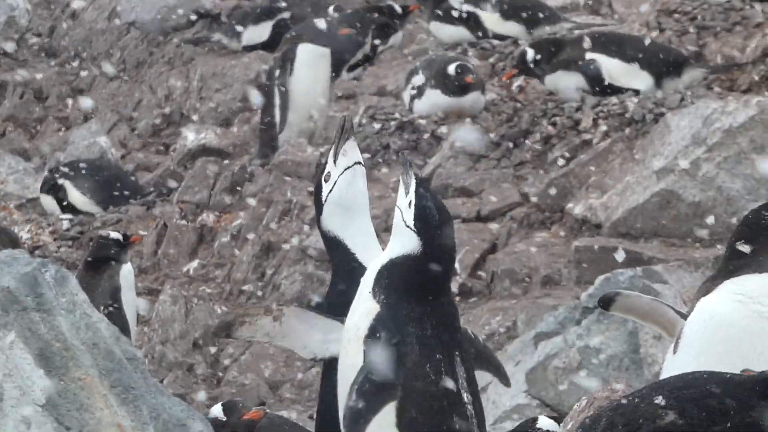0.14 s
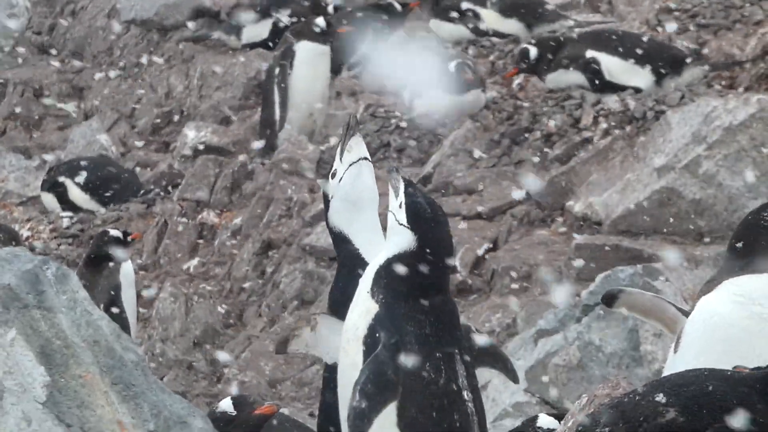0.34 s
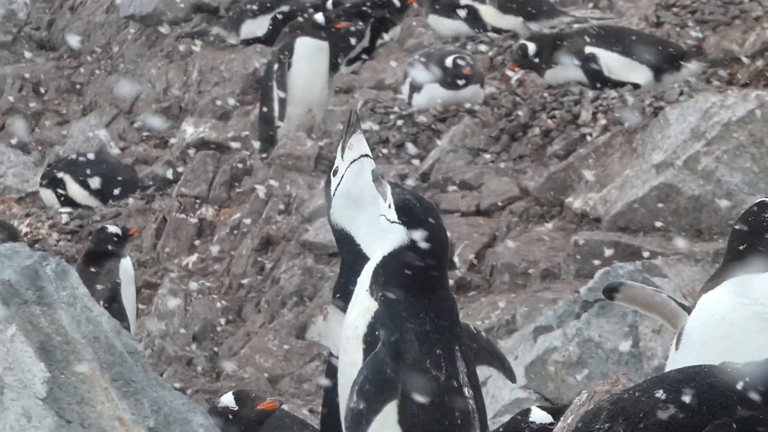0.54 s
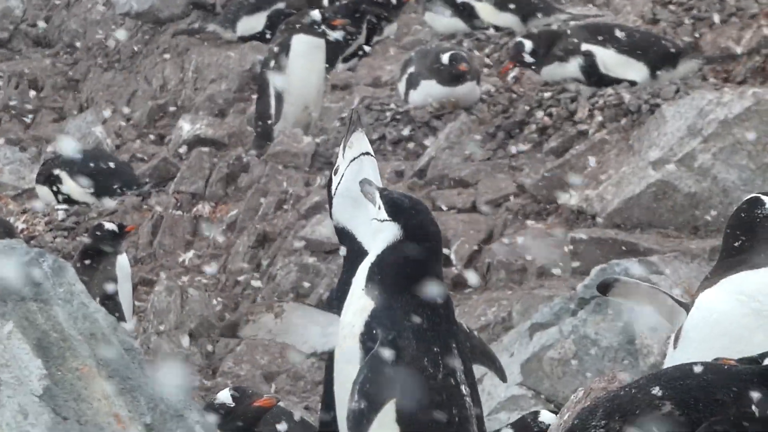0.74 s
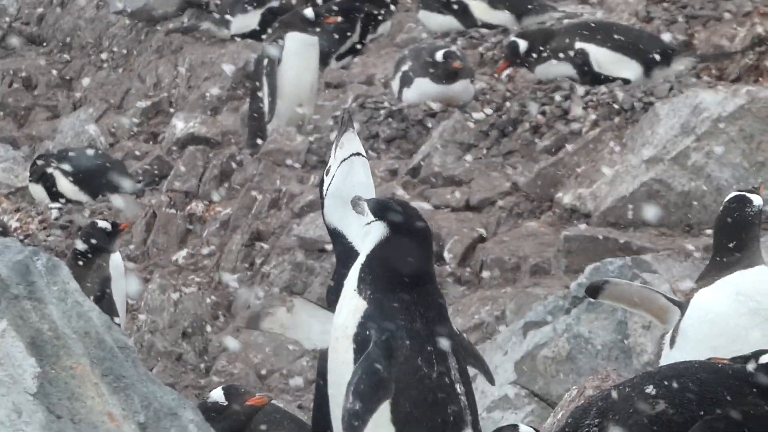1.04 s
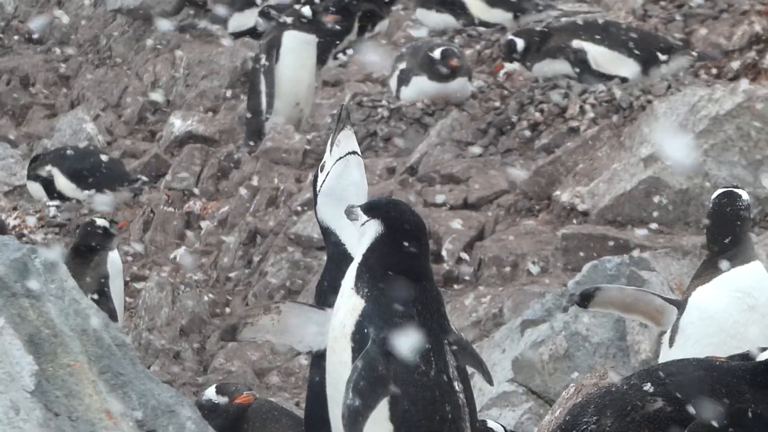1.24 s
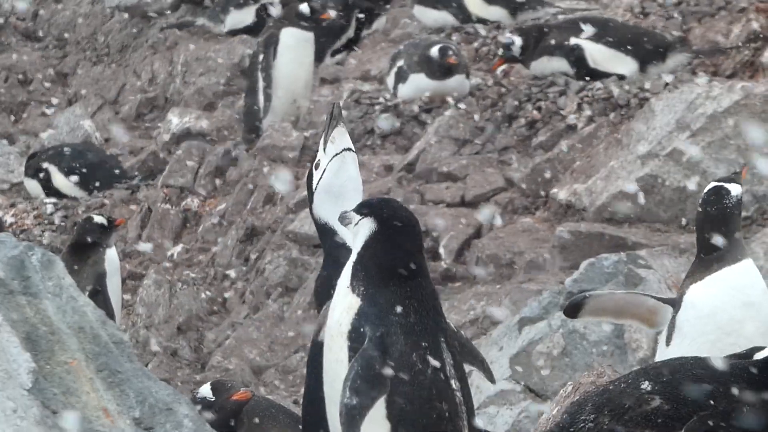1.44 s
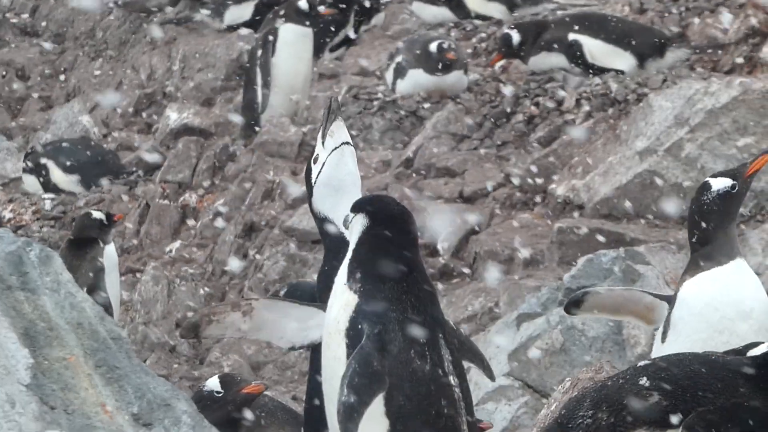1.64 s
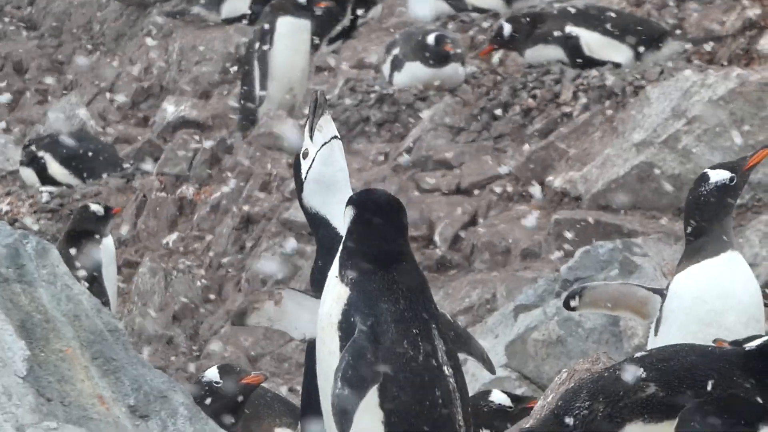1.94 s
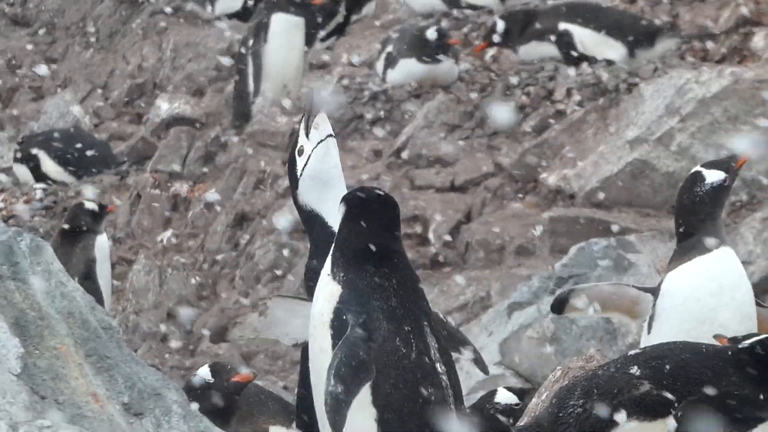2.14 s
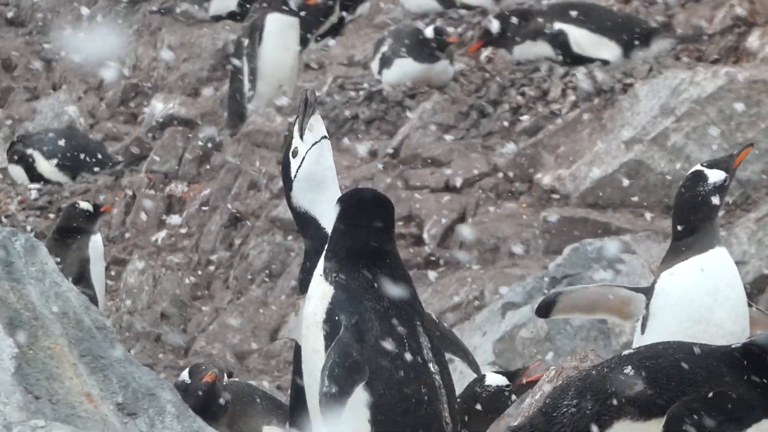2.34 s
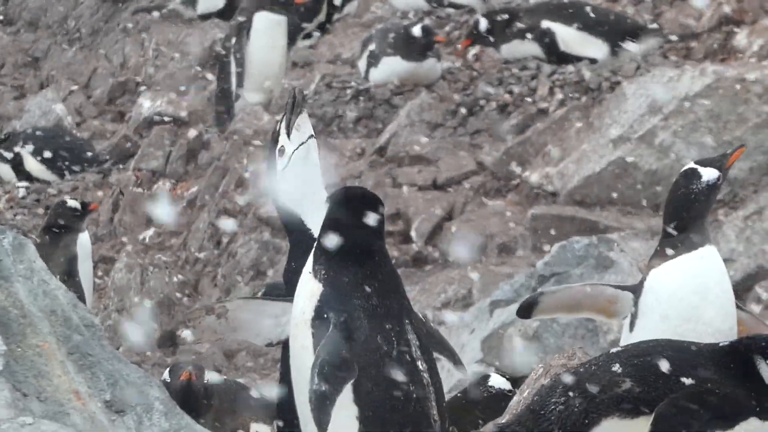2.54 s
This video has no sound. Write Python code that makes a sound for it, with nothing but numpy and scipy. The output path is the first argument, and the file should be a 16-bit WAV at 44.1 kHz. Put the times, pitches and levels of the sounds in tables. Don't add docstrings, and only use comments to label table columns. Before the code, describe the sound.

Close penguin bray, harsh sawing growls and short squeaks, with distant colony hum and light wind.

```python
import sys
import numpy as np
from scipy import signal
from scipy.fft import rfft, irfft
from scipy.io import wavfile
from scipy.ndimage import uniform_filter1d

SR = 44100
rng = np.random.default_rng(int(sys.argv[2]) if len(sys.argv) > 2 else 0)


def unload_audio(sound):
    columns = np.transpose(np.atleast_2d(sound))
    steps = np.round(np.clip(columns, -1, 1) * 32767)
    wavfile.write(sys.argv[1], SR, steps.astype(np.int16))


def ratio(d):
    e = np.asarray(d, float) / 20
    return 10 ** e


N = 119070


def in_time(s, values):
    return np.interp(np.arange(N) / SR, s, values)


def rms_one(x):
    return x / np.sqrt(np.mean(x ** 2) + 1e-20)


def levelled(x, size):
    return x / np.sqrt(uniform_filter1d(x ** 2, size=size))


def filtered(x, order, hz, kind="low"):
    return signal.sosfilt(signal.butter(order, hz, kind, fs=SR, output="sos"), x)


def colour(x, points, cut_hz):
    hz, table = np.maximum(np.arange(N // 2 + 1) * SR / N, 1), np.array(points)
    gain_db = np.interp(np.log(hz), np.log(table[:, 0]), table[:, 1])
    return irfft(rfft(x) * ratio(gain_db) / (1 + (cut_hz / hz) ** 8), N)


def drift(rate_hz):
    r = np.exp(-2 * np.pi * rate_hz / SR)
    noise = rng.standard_normal(N + SR)
    return rms_one(signal.lfilter([1], [1, -2 * r, r * r], noise)[SR:])


def resonance(x, hz, width_hz):
    r = np.exp(-np.pi * width_hz / SR)
    hz, out, state = hz + np.zeros(N), np.zeros(N), np.zeros(2)
    for i in range(0, N, 128):
        b = [(1 - r * r) / 2, 0, (r * r - 1) / 2]
        a = [1, -2 * r * np.cos(2 * np.pi * hz[i] / SR), r * r]
        out[i:i + 128], state = signal.lfilter(b, a, x[i:i + 128], zi=state)
    return out


def tones(hz, levels_db):
    phase = 2 * np.pi * np.cumsum(hz) / SR
    return rms_one(sum(ratio(db) * np.sin((k + 1) * phase) for k, db in enumerate(levels_db)))


def pulses(hz):
    clicks = np.diff(np.floor(np.cumsum(hz) / SR), prepend=0)
    return filtered(clicks, 2, 3500)


# t/s, level/dB, half tone f/Hz
OUT_STROKES = [
    [(0.2, -46.5, 397), (0.234, -27.5, 427.7), (0.26, -23.5, 496), (0.3, -23.5, 512)],
    [(0.3, -24.5, 502.4), (0.312, -21, 466.5), (0.408, -31.5, 331.6), (0.43, -31.5, 318.5)],
    [(0.54, -17, 486), (0.578, -22.5, 497), (0.618, -21.5, 408.5), (0.655, -30, 412.3)],
    [(0.77, -18, 493), (0.818, -19, 469.4), (0.85, -21, 400.7), (0.855, -24.5, 408)],
    [(1.005, -17, 508), (1.033, -19.5, 504), (1.075, -18, 452), (1.1, -24, 417)],
    [(1.55, -19, 499.2), (1.584, -21, 454), (1.604, -25, 407.1), (1.7, -36.5, 402.8)],
    [(1.8, -18.5, 501.6), (1.846, -20, 455.7), (1.928, -40.5, 379.3), (1.96, -63, 331.4)],
    [(2.088, -36, 496.2), (2.098, -21, 469), (2.124, -22.5, 430), (2.2, -31, 371.7)],
    [(2.37, -19.5, 474.2), (2.406, -22.5, 446.7), (2.414, -23, 418), (2.52, -53.5, 315.3)],
]
# t/s, level/dB, half tone f/Hz
IN_STROKES = [
    [(0.43, -32, 429), (0.45, -31.5, 418.4), (0.472, -29.5, 469.4), (0.498, -42, 530.4),
     (0.515, -54.5, 554)],
    [(0.655, -29, 426.6), (0.683, -19.5, 438.5), (0.717, -19.5, 480), (0.743, -31.5, 610),
     (0.752, -28, 612.5)],
    [(0.855, -22.5, 402), (0.903, -22.5, 402.7), (0.953, -17.5, 496.7), (0.967, -28.5, 539.4),
     (0.982, -25.5, 560)],
    [(1.1, -19.5, 412.6), (1.118, -21.5, 413.6), (1.186, -33.5, 317.7), (1.2, -55.5, 300),
     (1.21, -46.5, 309)],
    [(1.452, -66, 442), (1.462, -33, 465.7), (1.502, -21, 490), (1.534, -28, 612), (1.545, -26.5, 589.7)],
    [(1.7, -39.5, 424.6), (1.726, -25.5, 455), (1.75, -25, 487), (1.77, -48, 557.5), (1.785, -47, 552.7)],
    [(1.983, -52, 399.8), (1.995, -31.5, 410.2), (2.042, -19, 462), (2.074, -30, 530.9),
     (2.085, -35.5, 538)],
    [(2.2, -36.5, 448.8), (2.214, -35, 462.6), (2.264, -39.5, 429.4), (2.296, -21, 478.6),
     (2.36, -43.5, 501)],
]


def strokes():
    rows = [(*row, 1) for stroke in OUT_STROKES for row in stroke]
    rows += [(*row, 0) for stroke in IN_STROKES for row in stroke]
    rows = np.array(sorted(rows))
    level_db, hz, out = (in_time(rows[:, 0], column) for column in rows.T[1:])
    t = np.arange(N) / SR
    silent = (t < rows[0, 0]) | (t > rows[-1, 0]) | ((t > 1.21) & (t < 1.452))
    return uniform_filter1d(level_db, size=200), hz, out, silent


LOUD_DB = -21


def roughness(level_db, hz, out):
    t = np.arange(N) / SR
    weak = .042 * (LOUD_DB - level_db)
    early_or_late = .09 * ((t > 1.3) | (t < .5))
    tired = .008 * out * (t > 1.3) * np.maximum(435 - hz, 0)
    return np.clip(.065 + weak + early_or_late + tired, .05, .8)


def syrinx(level_db, hz, out, rough, phase, waver):
    clean_to_hz = 6800
    quarter = ratio(-17 + out * (-8 + 17))
    half = ratio(-1 + out * (-7 + 1))
    clean = 0
    for k in range(2, 40):
        gain = quarter if k % 2 else half if k % 4 else 1
        rolloff = 1 + (k * 235 / clean_to_hz) ** 4
        clean = clean + gain * waver[k % 11] / rolloff * np.cos(k * phase + rng.uniform(0, 3.2))
    gate = np.exp(.35 * np.cos(2 * phase) + .12 * np.cos(phase))
    breath = rms_one(rng.standard_normal(N) * gate)
    hiss = filtered(breath, 2, clean_to_hz, "high") * ratio(7 * out + 1.47 * (level_db - LOUD_DB))
    return np.sqrt(1 - rough) * levelled(clean, 800) + np.sqrt(rough) * 2.4 * breath + 1.5 * hiss


# f/Hz, level/dB
THROAT_GAIN = [(410, -58), (700, 0.5), (1190, 6), (1970, 1), (3230, -3.5), (6180, -10.5), (8540, -24.5),
               (10400, -19.5), (12300, -35.5), (15700, -41.5)]
# t/s, beak level/dB, beak shift [share of its f]
MOUTH_SHAPE = [(.25, 6.5, -0.28), (.32, 4, -0.082), (.46, -2.5, -0.22), (.56, 4.8, 0.064),
               (.7, -10.5, -0.019), (.8, 6.5, .01), (.93, -6, -0.049), (1.05, 11, -0.051),
               (1.15, -17, -0.0065), (1.5, -2, -0.097), (1.57, 5.5, -0.03), (1.74, -8, -0.07),
               (1.83, 5, -0.0087), (2.04, -4, -0.038), (2.11, 2.5, -0.015), (2.3, -4.5, -.05),
               (2.39, 3, -0.0072)]


def vocal_tract(source, level_db, hz, out, rough):
    source = source - .59 * out * resonance(source, 3.11 * hz, 760)
    nasal = ratio(-3) * resonance(source, 5130, 700)
    notch = .26 * resonance(source, 4170, 540)
    source = source + nasal - notch
    s, mouth_db, shift = np.transpose(MOUTH_SHAPE)
    opening = 1 + in_time(s, shift) + .004 * (level_db - LOUD_DB)
    beak_hz = np.clip(4.32 * hz * opening, 1250, 2250)
    beak_db = -1 + out * (5 + 1) + in_time(s, mouth_db) - 16 * rough
    beak = ratio(beak_db) * rms_one(resonance(source, beak_hz, 553))
    return colour(source + beak, THROAT_GAIN, 778)


def bray():
    level_db, hz, out, silent = strokes()
    rough = roughness(level_db, hz, out)
    phase = np.pi * np.cumsum(hz * (1 + rough * .035 * drift(120))) / SR
    waver = [ratio(3.5 * drift(25)) for _ in range(11)]
    source = syrinx(level_db, hz, out, rough, phase, waver)
    voice = vocal_tract(source, level_db, hz, out, rough)
    chest = ratio(-27) * waver[0] * np.cos(2 * phase)
    ducked_db = 20. * silent + 8.8 * (squeaking()[1] > 0)
    gain = ratio(level_db - uniform_filter1d(ducked_db, size=260))
    return gain * (levelled(voice, 1000) + chest)


# t/s, length/s, level/dB, f/Hz
SQUEAK_EVENTS = [
    (.488, .016, -36, 1550),
    (.526, .016, -23, 1420),
    (.749, .021, -27, 1480),
    (.981, .024, -24, 1500),
    (1.787, .014, -28, 1420),
    (2.36, .012, -32, 1400),
]


def squeaking():
    hz, gain, t = np.full(N, 1400.), np.zeros(N), np.arange(N) / SR
    for start, length, level_db, pitch_hz in SQUEAK_EVENTS:
        part = (t - start) / length
        on = (part > 0) & (part < 1.15)
        hz[on] = pitch_hz * (1 + .1 * (.5 - part[on]))
        ramps = np.minimum(part[on] / .15, (1.15 - part[on]) / .15)
        gain[on] = ratio(level_db) * np.clip(ramps, 0, 1)
    return hz, gain


SQUEAK_HARMONICS = [0, -9, -24, -22, -38]


def squeaks():
    hz, gain = squeaking()
    return gain * tones(hz, SQUEAK_HARMONICS)


# t/s, level/dB
TRUMPET_END = [
    (0, -41),
    (.105, -40),
    (.125, -50),
    (.15, -66),
]
TRUMPET_HARMONICS = [-7, 0, -16, -11, -20, -16, -26, -28, -30, -35, -36]


def trumpet():
    droop = np.clip(np.arange(N) / SR - .105, 0, .1)
    hz = 588 * (1 + .0067 * drift(24) - droop)
    level_db = in_time(*np.transpose(TRUMPET_END)) + 3 * drift(32)
    return ratio(level_db) * tones(hz, TRUMPET_HARMONICS)


# t/s, level/dB, brightness level/dB
PURR_THROBS = [(1.217, -57.5, 13), (1.25, -57.5, 17), (1.284, -45.5, -0.5), (1.317, -50, 0),
               (1.347, -57.5, 16), (1.392, -59.5, 18.5), (1.439, -52.5, -30.5), (1.65, -44, -13),
               (2.463, -42, -12), (2.509, -56, 5), (2.546, -73, -22), (2.584, -81, -12), (2.622, -82, -32),
               (2.656, -76, -31)]


def purr():
    source = pulses(264 * (1 + .03 * drift(30))) + .005 * rng.standard_normal(N)
    hollow = rms_one(resonance(source, 628.7, 63.7))
    rasp = rms_one(filtered(source, 2, [800, 3800], "band"))
    t, out = np.arange(N) / SR, 0
    for s, level_db, bright_db in PURR_THROBS:
        after = np.clip((t - s) / .012, 0, 30)
        linger = after * np.exp(1 - after) ** 1.5 * 1.6
        burst = np.minimum(8 * after, 1) * np.exp(-(1.6 * after) ** 2)
        out = out + ratio(level_db) * (hollow * linger + ratio(bright_db) * rasp * burst)
    return out


def rocks(x):
    echo_db, t60_s, bright = -4.5, .071, 3.6
    t = np.arange(SR // 4) / SR
    scatter = rng.standard_normal((2, len(t))) * ratio(-60 * t / t60_s) * (t > .002)
    scatter = scatter + bright * np.diff(scatter, prepend=0)
    scatter = scatter / np.sqrt((scatter ** 2).sum(1, keepdims=True))
    return ratio(echo_db) * signal.fftconvolve(x[None], scatter, axes=1)[:, :N]


GROWLERS_HZ = [249.8, 300.5, 304.6]
# f/Hz, level/dB
HUM_SPECTRUM = [(120, -40), (200, -19), (596, -2), (728, -12), (1840, -16.5), (2130, -19.5), (15500, -39)]
# t/s, level/dB
COLONY_SWELL = [(0, -2.5), (.2, -4.5), (.5, 0), (.8, -0.5), (1.2, -1), (1.5, -1.5), (1.75, 0.5), (1.95, -4),
                (2.2, 4.5), (2.501, -0.9), (2.7, -6)]


def crowd():
    noise = rng.standard_normal(N) + .8 * rng.standard_normal((2, N))
    out = ratio(-47 + 1.5 * drift(6)) * rms_one(colour(noise, HUM_SPECTRUM, 180))
    for hz in GROWLERS_HZ:
        source = pulses(hz * (1 + .1 * drift(3.2) + .00803 * drift(53)))
        voice = resonance(source, 2 * hz, 200) + .7 * resonance(source, hz, 150)
        voice = rms_one(voice + .3 * resonance(source, 1150, 400))
        side_db = rng.uniform(-5.8, 1) * np.array([[1], [-1]])
        out = out + ratio(-58 + 5 * drift(7.9) + 5.53 * drift(12) + side_db) * voice
    return out * ratio(in_time(*np.transpose(COLONY_SWELL)))


# f/Hz, level/dB
WIND_SPECTRUM = [(15, -49), (25, -19), (70, -2), (102, 3), (177, 4.5), (420, -14.5), (500, -38), (650, -22),
                 (1100, -120)]
# t/s, width/s, level/dB
WIND_GUSTS = [(.03, .03, 11), (.085, 0.022, 4), (0.296, 0.052, 17), (.75, 0.031, 4), (1.01, 0.031, 4),
              (1.58, 0.063, 7.5), (1.83, 0.023, 18.5), (1.958, 0.022, 14), (2.17, 0.022, 7),
              (2.26, 0.028, 5.5), (2.67, 0.013, 5)]


def wind():
    t = np.arange(N) / SR
    gust_db = sum(db * np.exp(-((t - s) / width) ** 2) for s, width, db in WIND_GUSTS)
    noise = colour(rng.standard_normal((2, N)), WIND_SPECTRUM + [(900, -60)], 20)
    mid, side = levelled(noise, 2500) * ratio(gust_db + 1.5 * drift(7))
    return ratio(-56.5) * (ratio(-5) * mid + side * [[1], [-1]])


def scene():
    near = bray() + squeaks() + trumpet() + purr()
    lean = filtered(near, 1, 3200) * (ratio(-.85) - 1)
    return near + lean * [[1], [-1]] + rocks(near) + crowd() + wind()


def roll_off(x):
    return signal.sosfilt(signal.butter(12, 15710, fs=SR, output="sos"), x)


def record(dry):
    top_cut = signal.cheby2(10, 60, 16600, fs=SR, output="sos")
    return roll_off(signal.sosfilt(top_cut, dry))


dry = scene()
out = record(dry)
unload_audio(out)
```